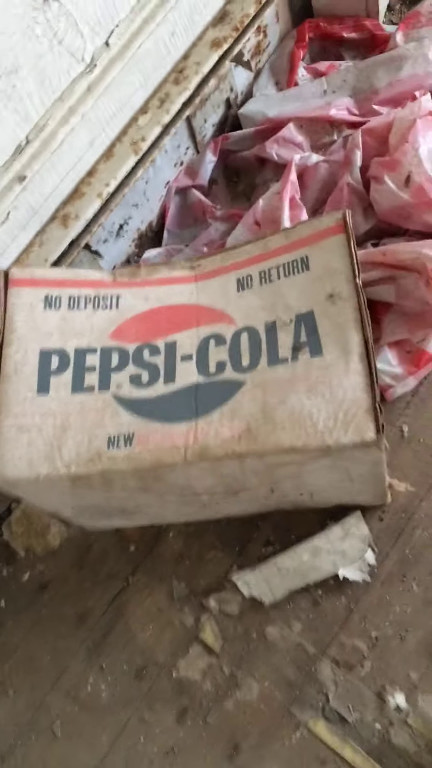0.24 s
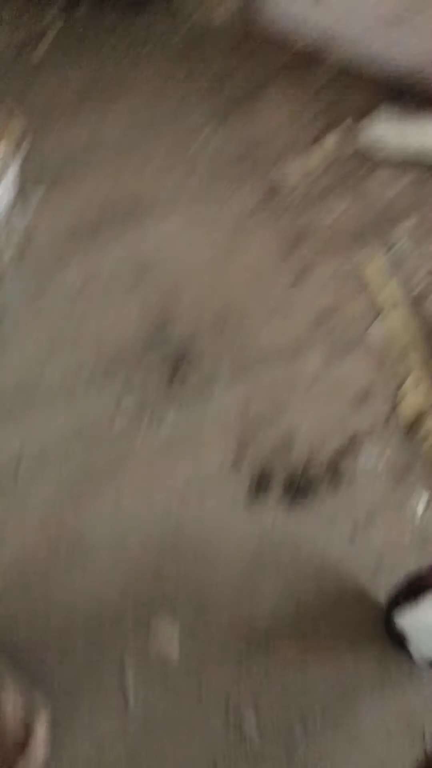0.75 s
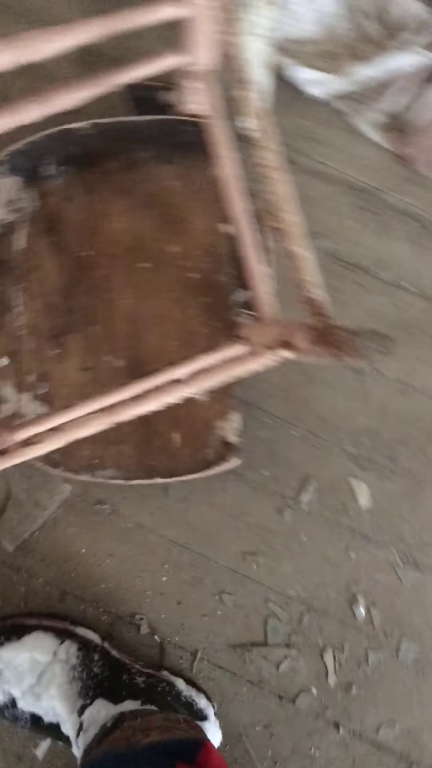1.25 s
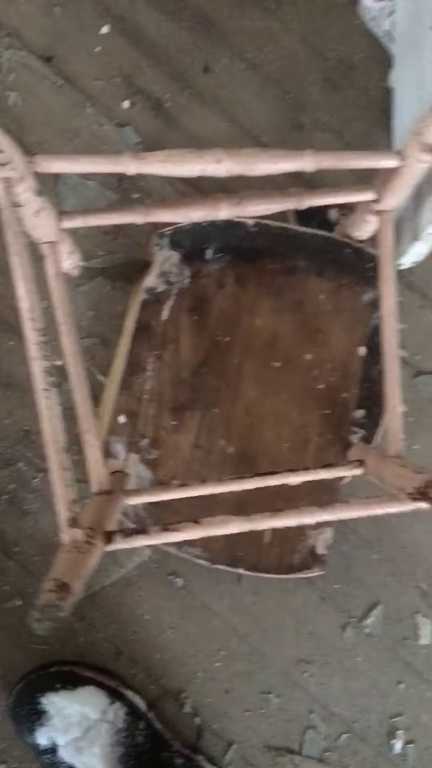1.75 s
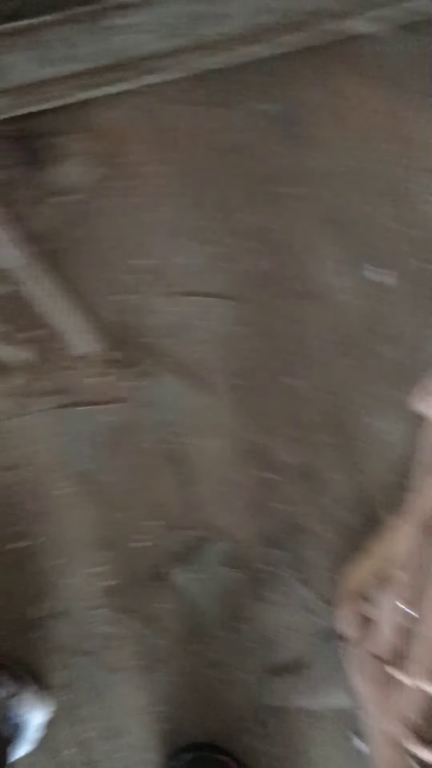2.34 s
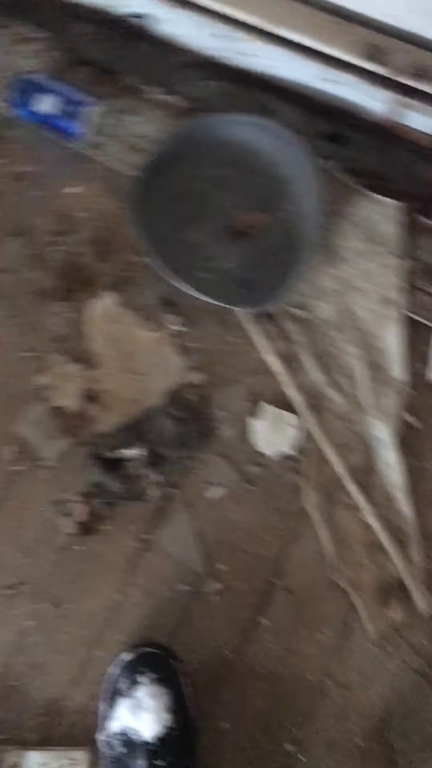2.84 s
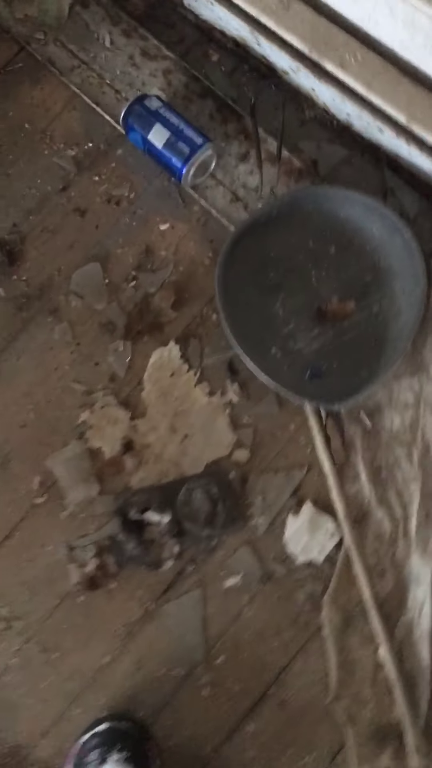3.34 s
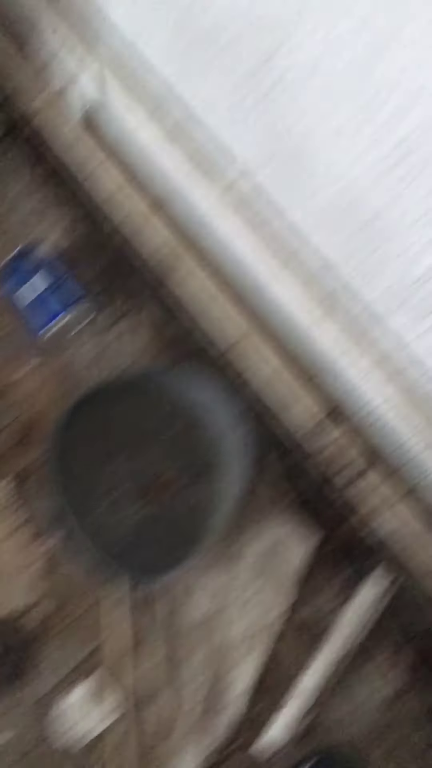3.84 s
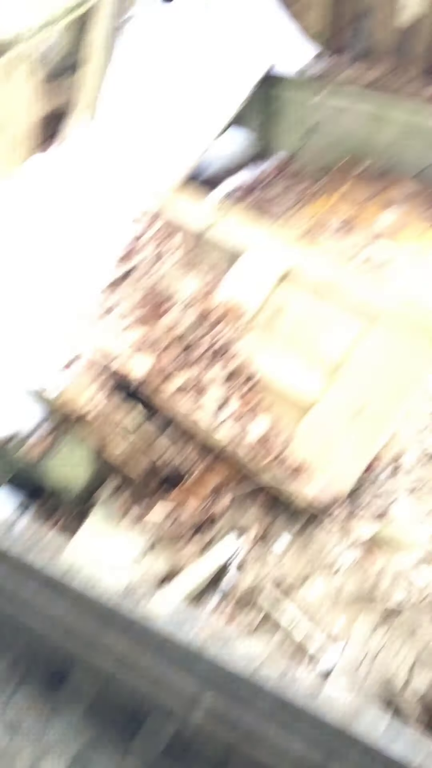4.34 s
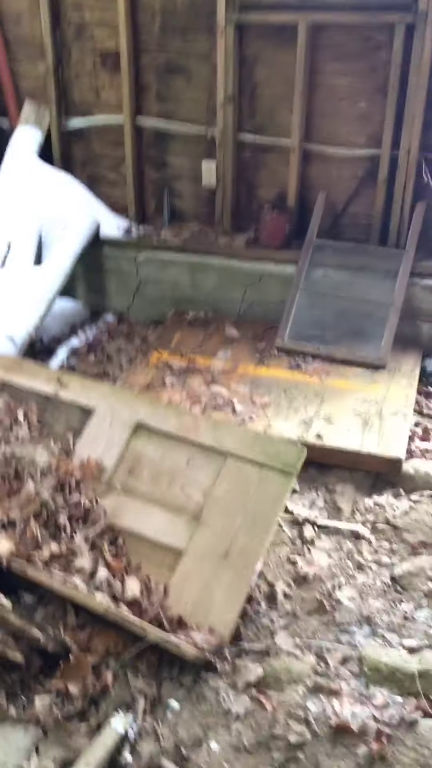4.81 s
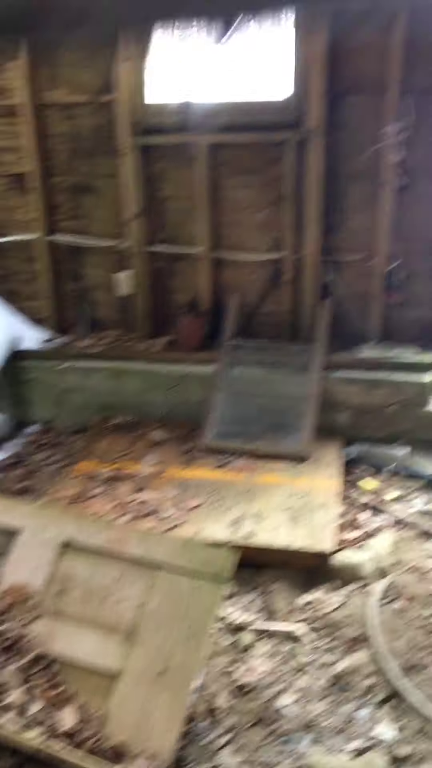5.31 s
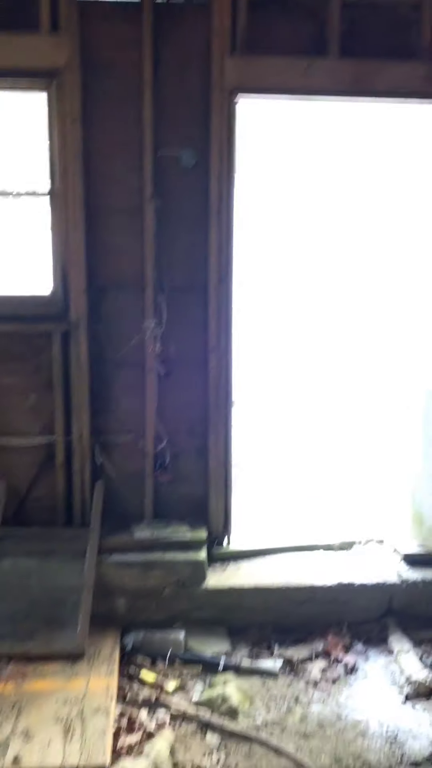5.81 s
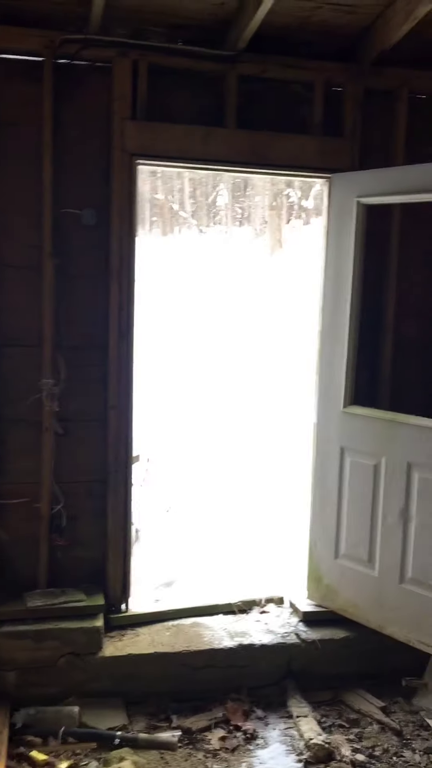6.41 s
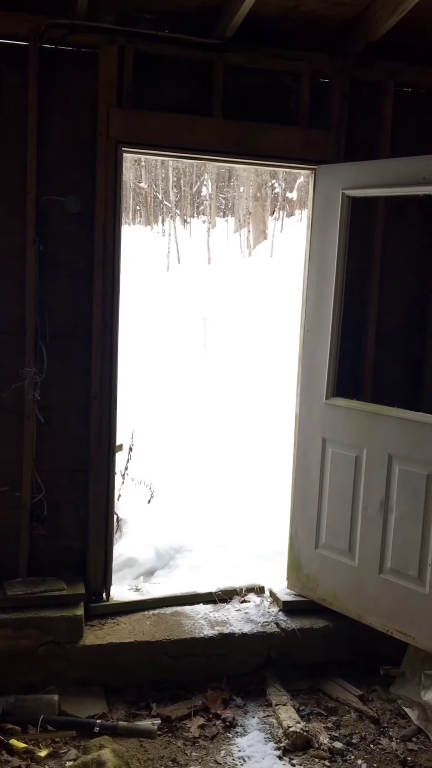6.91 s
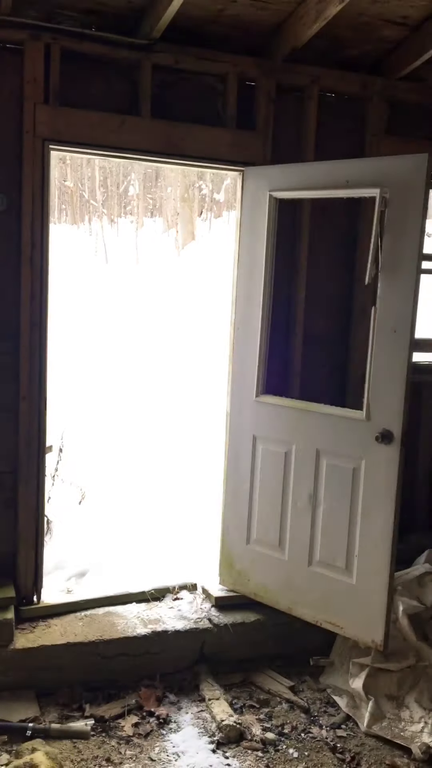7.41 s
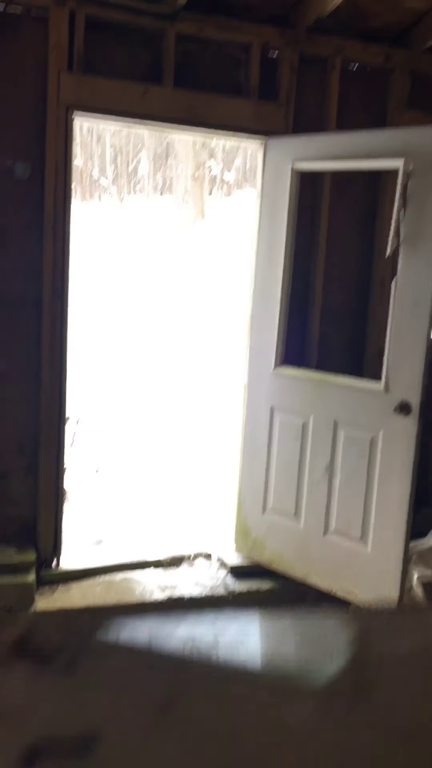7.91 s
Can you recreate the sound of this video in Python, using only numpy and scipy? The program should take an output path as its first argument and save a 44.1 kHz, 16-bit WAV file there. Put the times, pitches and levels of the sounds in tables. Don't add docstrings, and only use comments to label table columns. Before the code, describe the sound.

Someone in boots walks over old floorboards in a bare, empty room. Soft scuffs and small ticks come first, then one heavy hollow knock, a pause, and a burst of brittle plaster crunching and snapping wood. More gritty steps lead to a loud, rapid wooden clatter. After that only quiet air, faint ticks and a light sleeve rustle remain. Close handheld phone sound, midrange-heavy, with short room echo.

```python
import sys
import numpy as np
from scipy import signal
from scipy.fft import rfft, irfft, next_fast_len
from scipy.io import wavfile
from scipy.ndimage import uniform_filter1d, map_coordinates

SR = 44100
rng = np.random.default_rng(int(sys.argv[2]) if len(sys.argv) > 2 else 0)


def amplitude_ratio(level_db):
    exponent = np.asarray(level_db, float) / 20
    return 10 ** exponent


def transcribe(u):
    v = np.clip(np.atleast_2d(u).T, -1, 1)
    q = np.round(v * 32767).astype(np.int16)
    wavfile.write(sys.argv[1], SR, q)


N = 359856

# (frequency [Hz], level per Hz [dB])
SAND_COLOUR = [(2350, -19.5), (4000, 4), (6350, -0.5), (9240, 2), (10400, -5), (12000, -1), (15200, -6.5),
               (16200, -40)]
# (time [s], peak [dB], chip pitch [Hz], treble [dB], echo [dB])
CLATTER_BLOWS = [(5.4587, -9, 1180, -3.5, -2.5), (5.464, -7.5, 2780, -4, -1),
                 (5.5407, -1.5, 1410, -11.5, 0), (5.545, -4.5, 2400, -5, 3), (5.6199, -6.5, 2620, -7, 6.5),
                 (5.692, -27, 2600, 0, 4), (5.7684, -28, 1510, -11.5, -2.5), (5.824, -7.5, 2360, -32, -3.5),
                 (5.8272, -6.5, 1520, -19.5, 0), (5.9913, -18, 1230, -12, 5.5), (5.997, -23.5, 1086, -7, 0),
                 (6.01, -25.5, 1300, -13, 7)]


def unit(x):
    return x / np.sqrt(np.mean(x ** 2) + 1e-20)


def share(gain):
    return gain / np.linalg.norm(gain)


def along(points, hz):
    f, v = np.transpose(points)
    return np.interp(np.log(hz + 1), np.log(f + 1), v)


def filtered(x, response):
    n = x.shape[-1]
    m = next_fast_len(n + 8192)
    return irfft(rfft(x, m) * response(np.fft.rfftfreq(m, 1 / SR)), m)[..., :n]


def resonance(hz, centre_hz, width_hz):
    return 1j * hz * width_hz / (centre_hz ** 2 - hz ** 2 + 1j * hz * width_hz)


def causal(gain):
    cepstrum = irfft(np.log(gain + 1e-5))
    half = len(cepstrum) // 2
    cepstrum[1:half] *= 2
    cepstrum[half + 1:] = 0
    return np.exp(rfft(cepstrum))


def wobble(rate):
    knots = rng.standard_normal(int(N * rate / SR) + 4)
    return map_coordinates(knots, [np.arange(N) * rate / SR])


def add(track, sound, s):
    part = track[round(s * SR):][:len(sound)]
    part += sound[:len(part)]


def swells(rows, rise_s, fall_db_per_s):
    out, t = np.zeros(N), np.arange(SR) / SR
    for s, hold, db in rows:
        decay = amplitude_ratio(db - fall_db_per_s * np.maximum(t - max(hold, rise_s), 0))
        add(out, decay * np.minimum(t / rise_s, 1) ** 2, s)
    return out


def echo(t):
    # (frequency [Hz], t60 [s])
    room = [(200, 0.72), (700, 0.31), (2000, 0.31), (5000, 0.25), (13000, 0.18)]
    hz, frames, z = signal.stft(rng.standard_normal(len(t)), SR, nperseg=128)
    decay = amplitude_ratio(-60 * frames / along(room, hz)[:, None])
    tail = signal.istft(z * decay, SR, nperseg=128)[1][:len(t)]
    tail *= 1 - np.exp(-t / 0.00053)
    tail *= 1 + 0.86 * np.exp(-t / 0.0092)
    return share(tail)


def boards(hz):
    # (frequency [Hz], width [Hz], level [dB])
    floor_modes = [(44.6, 14, -2.5), (64, 4.1, 0.5), (92, 13, 5), (137, 10, -0.5), (154.9, 7, 3.5),
                   (207, 4.7, -2), (228, 3.4, -6.5), (394, 93, -12.5)]
    return sum((-1) ** k * amplitude_ratio(db) * resonance(hz, c, w) for k, (c, w, db) in enumerate(floor_modes))


def thuds():
    # (time [s], peak [dB], strongest board pitch [Hz], roll length [s])
    blows = [(0.178, -59, 172, 0.07), (0.286, -30.5, 95, 0.048), (0.356, -33.5, 63, 0.061),
             (0.53, -45.5, 54, 0.067), (0.71, -44, 56.3, 0.07), (1.205, -15.5, 103.6, 0.023),
             (1.245, -45, 158, 0.077), (1.594, -41.5, 129, 0.062), (1.897, -44.5, 143, 0.062),
             (2.341, -30, 55.4, 0.05), (2.63, -41, 68, 0.076), (3.208, -39, 237, 0.061),
             (3.292, -29, 320, 0.07), (3.357, -26, 87, 0.042), (3.429, -25, 81, 0.13),
             (3.956, -40, 317, 0.03), (4.499, -34, 92, 0.065), (4.572, -36.5, 98, 0.061),
             (4.606, -37, 220, 0.04), (4.791, -34, 231, 0.035), (5.149, -37, 305.3, 0.098),
             (5.257, -35, 223, 0.093), (5.331, -30.5, 203, 0.059), (5.569, -34, 137, 0.054),
             (5.636, -38, 140, 0.087), (5.997, -44.5, 126.5, 0.17), (6.398, -49.5, 89.8, 0.11),
             (6.771, -50.5, 89, 0.021)]
    out, t = np.zeros(N), np.arange(SR // 2) / SR
    for s, db, hz, roll in blows:
        force = rng.standard_normal(len(t)) * np.exp(-(t / max(roll, .005)) ** 2)
        force[:140] += 3 * np.hanning(140)
        blow = filtered(force, lambda f: boards(f) + 1.6 * resonance(f, hz, 0.09 * hz))
        add(out, amplitude_ratio(db - 2.0) * blow / np.abs(blow).max(), s)
    return out


def even(x):
    envelope = np.sqrt(np.abs(uniform_filter1d(x ** 2, int(.06 * SR))))
    return unit(x / (envelope + .2 * x.std()))


def groan():
    # (time [s], boards level [dB], joists level [dB])
    loads = [(0.32, -50.5, -39.5), (0.68, -65, -48.5), (1.229, -32, -39), (1.62, -56, -47), (1.9, -62, -83),
             (2.359, -45, -36.5), (2.74, -50.5, -72), (3.358, -30, -45), (3.65, -59, -87),
             (4.0, -50.5, -59), (4.11, -60, -57), (4.52, -56, -44), (4.62, -50, -64.5), (4.821, -49, -64),
             (5.36, -34.5, -47.5), (5.66, -39, -64), (6.02, -41, -59.5)]
    rise_s, rest_db = 0.095, -74

    def push(column, fall_db_per_s):
        rows = [(row[0] - rise_s, 0, row[column]) for row in loads]
        return amplitude_ratio(rest_db) + swells(rows, rise_s, fall_db_per_s)

    def upper(f):
        return (boards(f) + 0.36 * resonance(f, 200, 240)) * f / (f + 90)

    load = rng.standard_normal((2, N))
    joists = filtered(load[1], lambda f: resonance(f, 47, 35) ** 2)
    pushed = amplitude_ratio(-6.5) * push(1, fall_db_per_s=130.5) * load[0]
    planking = filtered(pushed, upper) / filtered(load[0], upper).std()
    return planking + amplitude_ratio(-0.5) * push(2, fall_db_per_s=69) * even(joists)


def crack(gain, t60, echo_db, length_s=.4):
    rise_s = .002
    t = np.arange(int(length_s * SR)) / SR
    burst = rng.standard_normal(len(t)) * amplitude_ratio(-60 * t / t60) * np.minimum(0.17 + t / rise_s, 1)
    knots = t[::200]
    lumps = amplitude_ratio(0.49 * np.interp(t, knots, rng.standard_normal(len(knots))))
    source = share(burst) + amplitude_ratio(echo_db) * share(lumps * echo(t))
    sound = signal.fftconvolve(source, irfft(causal(gain)))[:len(t)]
    return sound / np.abs(sound).max()


def snaps():
    # (frequency [Hz], level per Hz [dB])
    lath = [(470, -15), (800, -9.5), (1440, -1), (1820, -8), (2010, -7.5), (4620, -24), (6500, -19.5),
            (8450, -76), (14300, -120)]
    # (frequency [Hz], width [Hz], level [dB])
    plank = [(1057, 26, 3), (1410, 85, -20), (2052, 27, -3.5), (2370, 130, 5.5), (2660, 56, -3.5),
             (3220, 120, 7), (3800, 35, -15.5), (4160, 150, 4.5), (4800, 82, -18.5), (6040, 67, -4),
             (6850, 31, -4.5), (6820, 32, -6)]
    # (time [s], peak [dB], chip pitch [Hz], treble [dB], hollow body [dB])
    knocks = [(0.175, -36, 3670, -1, 4), (1.1973, -17.5, 2230, -5, 7.5), (1.5855, -31, 1390, -33, 13.5),
              (2.3426, -32.5, 2180, -8, -10), (2.6402, -31.5, 1840, -10, 8), (3.3444, -17.5, 1850, -24, 2),
              (3.348, -15.5, 1870, -17, -10), (3.509, -23, 1380, -25, 13), (3.9619, -18.5, 3670, -2, -3),
              (4.1346, -28, 1010, -2.5, -5), (4.495, -35, 1320, -25, 4), (4.5026, -28, 1840, -8, -8),
              (4.5392, -18, 1300, -3, -1.5), (4.779, -24.5, 3330, -8.5, -13),
              (4.797, -30.5, 860, -20.5, 20), (4.831, -35, 3650, -20, 0), (5.25, -32, 1060, -6, 15)]
    # (time [s], peak [dB], chip pitch [Hz], treble [dB])
    breaks = [(1.2295, -22.5, 1210, -14), (2.3615, -32, 1970, -6), (3.196, -27.5, 1040, -5),
              (3.211, -15.5, 890, -2), (3.2173, -7, 1750, -6), (3.2399, -11, 2020, -2),
              (3.2567, -14.5, 1920, -12), (3.2924, -14, 2020, -1), (3.368, -23.5, 1350, -9.5),
              (3.3907, -19, 1670, -16.5), (3.458, -29, 1840, -7), (3.928, -23, 1900, -10.5),
              (3.2245, -16, 1600, -8.5), (3.248, -12.5, 2000, -5), (4.572, -21, 2520, -15.5),
              (4.73, -29, 1400, -2), (5.2771, -24, 1860, -12), (5.3336, -19.5, 1060, -22.5)]
    # (time [s], peak [dB], chip pitch [Hz], treble [dB])
    slivers = [
        (3.4286, -10, 1140, -21.5),
        (3.6553, -20, 1170, -8),
        (4.0247, -17, 2050, -1.5),
        (4.5852, -14.5, 1300, -8),
        (4.685, -12.5, 1300, -15.5),
    ]
    break_body_db = -51.5
    hits = [(*row, -4) for row in knocks]
    hits += [(*row, break_body_db, 1) for row in breaks]
    hits += [(*row, break_body_db, -12) for row in slivers]
    hits += [(*row, -34, echo_db) for *row, echo_db in CLATTER_BLOWS]

    out, f = np.zeros(N), np.fft.rfftfreq(4096, 1 / SR)
    for s, db, hz, treble_db, body_db, echo_db in hits:
        modes = sum(amplitude_ratio(g + rng.normal(0, 4)) * np.abs(resonance(f, c, w)) for c, w, g in plank)
        chip = amplitude_ratio(along(lath, f)) * (1 + 1.7 * modes) + 1.7 * np.abs(resonance(f, hz, 0.11 * hz))
        gain = np.sqrt(max(1 - amplitude_ratio(2 * treble_db), .05)) * share(chip)
        gain += amplitude_ratio(treble_db - 2.0) * share(amplitude_ratio(along(SAND_COLOUR, f)))
        gain += amplitude_ratio(body_db - 11.0) * share(np.abs(resonance(f, 550, 600)) ** 2)
        t60 = 0.016 + 0.0011 * min(echo_db, 0)
        add(out, amplitude_ratio(db - 5.0) * crack(gain, t60, echo_db + 5.5), s)
    return out


def ringing():
    # (frequency [Hz], level [dB], t60 [s])
    long_modes = [(1140, -8, .1), (1420, -5, .12), (2070, -7.5, .09), (2254, -9, .13), (2420, -11.5, .13),
                  (2630, -9.5, .13), (2870, -7, .1)]
    out, t = np.zeros(N), np.arange(SR // 2) / SR
    for s, db, *_ in CLATTER_BLOWS:
        ring = np.zeros(len(t))
        for hz, g, t60 in long_modes:
            decay = amplitude_ratio(g + rng.normal(0, 4) - 60 * t / t60)
            drift = .09 * np.cumsum(rng.standard_normal(len(t)))
            ring += decay * np.sin(2 * np.pi * hz * rng.normal(1, .012) * t + drift)
        add(out, amplitude_ratio(db - 21) * (1 - np.exp(-t / 0.0027)) * ring, s)
    return out


def grains(rate, spread_db):
    size = amplitude_ratio(spread_db * np.minimum(rng.exponential(size=N), 3)) * rng.choice([-1, 1], N)
    return unit(size * (rng.random(N) < rate / SR * amplitude_ratio(4 * wobble(30))))


def grit(drive, coarse_gain, fine_gain):
    # (frequency [Hz], level per Hz [dB])
    coarse_colour = [(150, -31), (250, -1.5), (533, -8), (1040, -4), (1890, -4), (3010, -9), (6000, -24),
                     (7800, -41), (13200, -120)]
    coarse = unit(filtered(drive, lambda f: causal(amplitude_ratio(along(coarse_colour, f)))))
    fine = unit(filtered(drive, lambda f: causal(amplitude_ratio(along(SAND_COLOUR, f)))))
    return coarse_gain * coarse + fine_gain * fine


def crunch():
    crumb_hz = [750, 1150, 1700, 2500, 3700, 5500, 8500, 12500]
    # (start [s], press [s], grit level [dB], fine sand against it [dB])
    presses = [(1.2, 0.039, -38, -18), (1.572, 0.034, -45.5, -24), (3.192, 0.17, -32, -6),
               (3.342, 0.1, -32.5, -2.5), (3.949, 0.019, -37, -2), (4.018, 0.028, -48.5, 10),
               (4.11, .035, -67, -6), (4.476, 0.024, -41, -11), (4.512, 0.048, -33.5, -11),
               (4.6, 0.11, -47, -2.5), (4.82, 0.016, -54.5, 3), (5.02, .05, -52, 0.5),
               (4.65, 0.2, -65.5, 15), (5.066, 0.065, -39.5, -6.5), (5.134, 0.047, -40.5, -40),
               (5.25, 0.11, -44.5, 0), (5.314, 0.087, -30.5, -24), (8.06, 0.05, -56, -5)]
    rise_s, fall_db_per_s = 0.017, 263.5
    crumbs = 0.44 * grains(rate=1500, spread_db=-5.0)
    for hz in crumb_hz:
        crumbs += filtered(grains(rate=160, spread_db=2.0), lambda f: resonance(f, hz, 0.23 * hz))
    crumbs = unit(crumbs)
    tail = echo(np.arange(int(.3 * SR)) / SR)
    drive = crumbs + 1.1 * signal.fftconvolve(crumbs, tail)[:N] + 0.218 * rng.standard_normal(N)
    coarse_rows = [(s, press, db - 9.0) for s, press, db, _ in presses]
    fine_rows = [(s, press, db + sand_db - 8.0) for s, press, db, sand_db in presses]
    coarse = swells(coarse_rows, rise_s, fall_db_per_s)
    fine = swells(fine_rows, rise_s, fall_db_per_s)
    return amplitude_ratio(1.7 * wobble(30)) * grit(drive, coarse, fine)


def ticks():
    # (frequency [Hz], level per Hz [dB])
    spark = [(2060, -27), (3500, -5.5), (6820, -0.5), (8110, -11.5), (10000, -2), (16200, -6.5)]
    # (time [s], peak [dB], pitch [Hz])
    bright = [(0.3703, -34, 8400), (1.3002, -41.5, 2880), (2.9733, -37, 3930), (3.1374, -34, 4050),
              (2.598, -55, 9000), (0.3472, -46, 6000), (0.3817, -40.5, 6500), (0.443, -40, 1480),
              (0.4738, -32, 8240), (0.617, -42.5, 6100), (2.854, -47.5, 1660), (2.9333, -39.5, 4060),
              (2.9916, -44.5, 3940), (3.0819, -52, 4450), (3.6253, -35, 6850), (3.759, -52, 1930),
              (3.904, -42.5, 1790), (4.0048, -28.5, 5800), (4.0515, -29, 3340), (4.122, -43, 3530),
              (4.2028, -35.5, 10470), (4.312, -49.5, 1550), (4.666, -33, 4900), (5.02, -46.5, 1430),
              (7.943, -46.5, 5000)]
    # (time [s], peak [dB], pitch [Hz])
    dull = [(1.6027, -42, 3750), (1.6886, -52, 3450), (1.7454, -48.5, 1050), (1.8161, -45, 1660),
            (1.973, -44.5, 1560), (2.5077, -43.5, 2430), (4.2116, -54, 1500), (4.5994, -36, 1838),
            (4.7094, -36.5, 2170), (4.762, -43.5, 3490), (6.125, -50.5, 1450), (6.3463, -49, 2295),
            (6.9994, -53, 1510), (7.345, -59.5, 2800)]
    # (time [s], peak [dB], pitch [Hz])
    pings = [(.166, -53, 5040), (.462, -53, 9000), (.765, -62, 6500), (1.603, -44, 1000), (1.616, -47, 900),
             (1.976, -51, 5950), (3.627, -42, 1390), (3.66, -35.5, 12800), (3.76, -50, 14600),
             (4.059, -32, 11900), (4.114, -49, 7500), (4.128, -44, 13000), (4.215, -53, 6000),
             (4.228, -46, 12500), (4.235, -47, 11500), (4.263, -50, 14000), (6.625, -64, 5700),
             (6.625, -64, 2810), (7.346, -63, 6280), (3.279, -30, 1300), (3.331, -30.5, 3200),
             (3.333, -29, 4300), (3.461, -37.5, 3600), (3.473, -35, 2000), (3.639, -46, 4100),
             (3.795, -57, 8500), (4.53, -35.5, 1300), (4.554, -37.5, 3300), (4.556, -44, 9200),
             (4.596, -39, 6300), (4.633, -44, 4000), (4.676, -43, 8800), (4.696, -34, 4500),
             (4.706, -42.5, 7800), (4.71, -41.5, 8100), (4.732, -42, 9000), (4.739, -41.5, 8000),
             (4.763, -40.5, 8300), (4.772, -43.5, 6000), (4.781, -39.5, 8000), (5.082, -39, 1380),
             (5.118, -38, 7000), (5.237, -44, 9000), (5.252, -38.5, 900), (5.283, -38.5, 8300),
             (5.304, -37.5, 6500), (5.344, -29, 1500), (5.358, -25, 2300), (5.384, -30, 2100),
             (5.42, -45, 11500), (5.445, -46, 8000), (7.786, -62.5, 6000), (8.018, -61, 4700),
             (8.078, -48, 1680), (8.098, -47, 2100), (8.11, -47, 4100)]
    hits = [(*row, -5) for row in bright]
    hits += [(*row, -27) for row in dull]
    hits += [(*row, -30) for row in pings]

    out, f = np.zeros(N), np.fft.rfftfreq(2048, 1 / SR)
    for s, db, hz, treble_db in hits:
        body = share(np.abs(resonance(f, hz, 0.3 * hz)) ** 2)
        gain = np.sqrt(max(1 - amplitude_ratio(2 * treble_db), .05)) * body
        gain += amplitude_ratio(treble_db + 7.5) * share(amplitude_ratio(along(spark, f)))
        add(out, amplitude_ratio(db + 1.5) * crack(gain, t60=.012, echo_db=-8, length_s=.2), s)
    return out


def lingering():
    # (time [s], peak [dB], pitch [Hz], t60 [s])
    rings = [ (.175, -52, 380, .1), (3.212, -32, 900, .05), (.385, -57, 9200, .15), (.476, -52, 9500, .22),
             (.476, -58, 6000, .18), (1.21, -25, 105, .16), (1.245, -29, 156, .4), (1.232, -38, 1200, .07),
             (1.215, -40, 2100, .08), (1.25, -33, 92, .35), (1.25, -40, 253, .3), (3.428, -23, 1080, .045),
             (3.429, -27, 1900, .04), (3.655, -44, 1200, .1), (5.55, -45, 285, .6), (5.56, -45, 480, .25),
             (5.55, -46, 690, .6), (5.83, -45, 480, .4), (5.83, -44, 400, .5), (5.83, -47, 310, .35),
             (6.0, -49, 320, .3), (3.509, -35, 1450, .07), (.476, -59, 14500, .15), (1.58, -57, 3800, .3),
             (1.603, -51, 3800, .1), (1.6, -57, 14600, .12), (1.816, -57, 3300, .08),
             (1.82, -50, 1550, .12), (1.972, -52, 1550, .08), (2.59, -64, 7000, .3),
             (2.645, -55, 7000, .24), (3.41, -47, 13400, .12), (3.428, -42, 9600, .13),
             (4.797, -42, 400, .1), (5.385, -42, 330, .9), (5.635, -39, 137, .45), (6.005, -50, 2750, .28),
             (6.343, -58, 2400, .06), (6.42, -58, 280, .08), (7.655, -56, 250, .1)]
    out, t = np.zeros(N), np.arange(SR // 2) / SR
    for s, db, hz, t60 in rings:
        drift = .05 * np.cumsum(rng.standard_normal(len(t))) * hz / 5000
        envelope = amplitude_ratio(db - 60 * t / t60) * (1 - np.exp(-t / 0.00037))
        add(out, envelope * np.sin(2 * np.pi * hz * t + drift), s)
    return out


def brush():
    # (time [s], rustle level [dB])
    movement = [(0.0, -84.5), (0.22, -62.5), (0.5, -56.5), (0.75, -62.5), (0.9, -60.5), (1.1, -69),
                (1.38, -60.5), (2.04, -65), (2.63, -60), (3.15, -67), (3.93, -63.5), (4.4, -65),
                (5.09, -58.5), (5.91, -58), (6.2, -71.5), (6.52, -67), (6.7, -75), (7.7, -75), (8.16, -58)]
    # (start [s], length [s], level [dB])
    sleeve = [
        (7.765, 0.042, -78.5),
        (7.85, .06, -70),
        (7.93, 0.028, -79),
        (8.005, .025, -82),
        (8.04, .13, -75),
    ]
    drive = rng.standard_normal(N) + 0.45 * grains(rate=590, spread_db=-0.5)
    db = np.interp(np.arange(N) / SR, *np.transpose(movement))
    fine = amplitude_ratio(-10.5 - 63.5 + 1.4 * (db + 63.5))
    fine = fine + swells(sleeve, rise_s=0.021, fall_db_per_s=150)
    return amplitude_ratio(2.5 * wobble(4.0)) * grit(drive, amplitude_ratio(db), fine)


def air():
    # (frequency [Hz], level per Hz [dB])
    colour = [(15, -33.5), (25, 5.5), (45, -0.5), (134, -17), (286, -18.5), (375, -19.5), (407, -21.5),
              (454, -24), (846, -18.5), (1300, -21.5), (1490, -23.5), (2790, -44.5), (4660, -43),
              (14900, -44), (16200, -54)]

    def edge(f):
        return 1 + 1.7 / (1 + ((f - 2150) / 380) ** 4) - .3 / (1 + ((f - 3100) / 500) ** 4)

    hiss = filtered(rng.standard_normal(N), lambda f: amplitude_ratio(along(colour, f)) * edge(f))
    settling = 1 - 0.25 * np.exp(-(np.arange(N) / SR / 0.35) ** 2)
    return amplitude_ratio(-58.5 + 1.0 + 1.0 * wobble(2.0)) * unit(hiss) * settling


def scene():
    floor = thuds() + groan()
    debris = snaps() + ringing() + crunch() + ticks() + lingering()
    return (floor + debris + brush() + air())[None]


def low_pass(x):
    return signal.sosfilt(signal.butter(12, 16650, fs=SR, output="sos"), x)


def record(dry):
    mix = filtered(dry, lambda f: (1j * f / (33 + 1j * f)) ** 3 * (f < 16000))
    return low_pass(mix)


dry = scene()
out = record(dry)
transcribe(out)
```